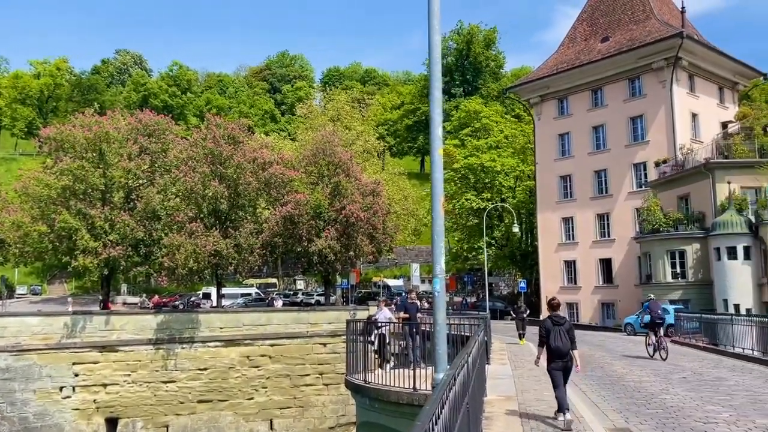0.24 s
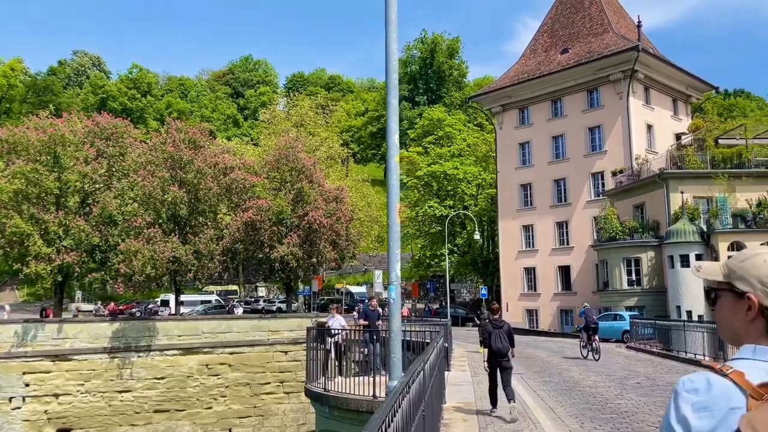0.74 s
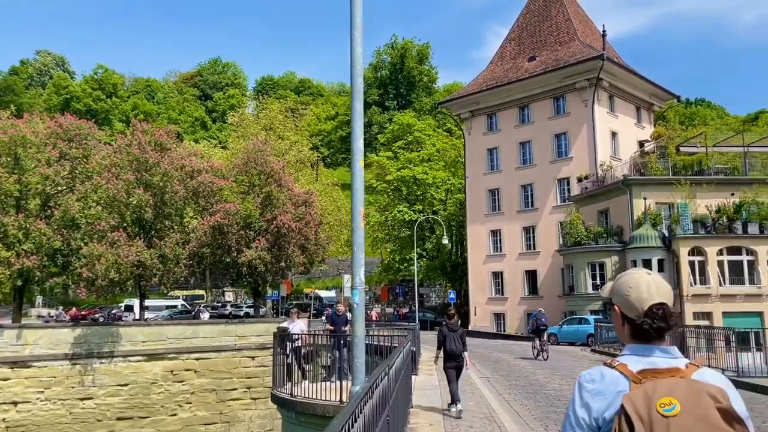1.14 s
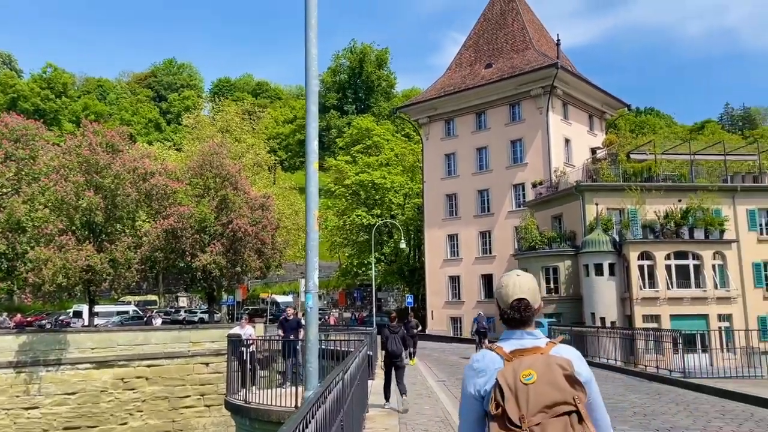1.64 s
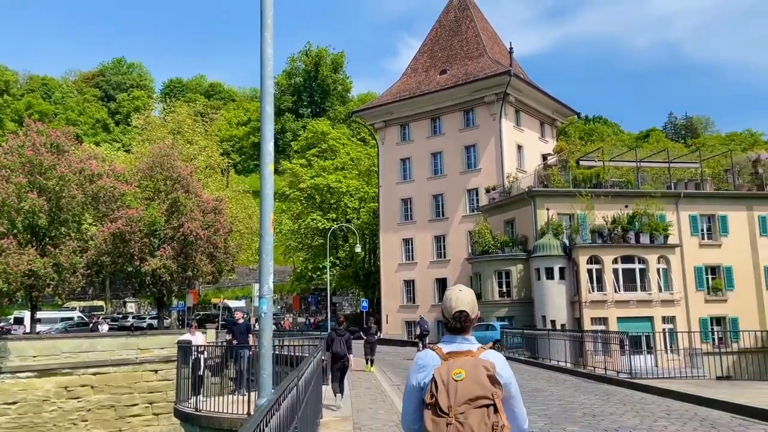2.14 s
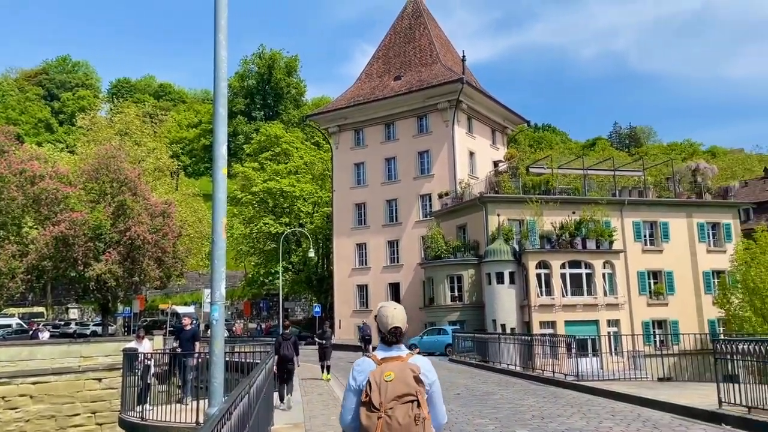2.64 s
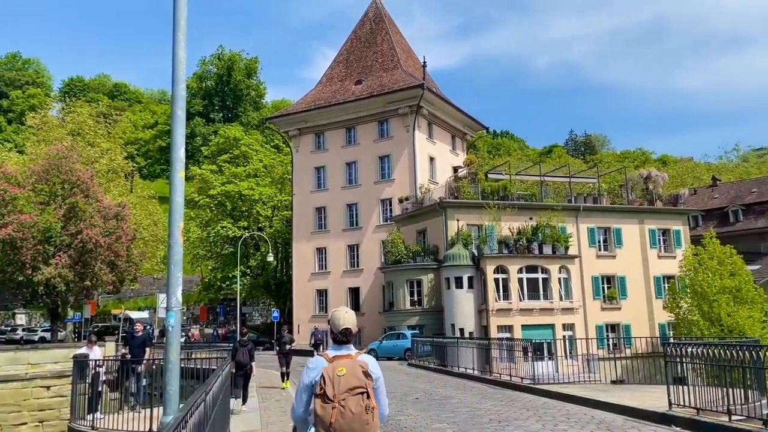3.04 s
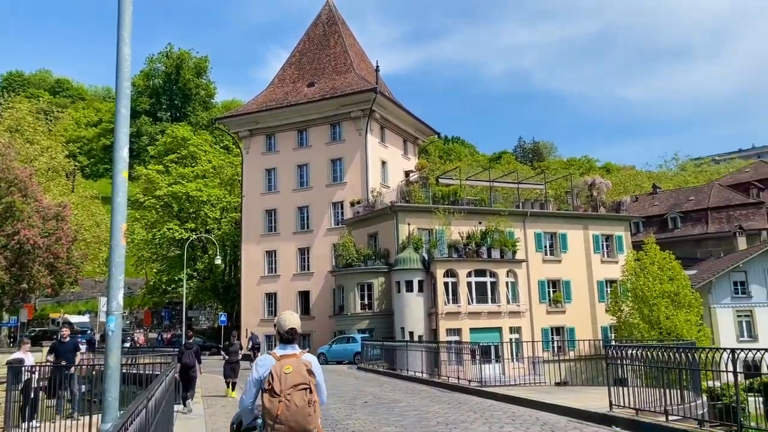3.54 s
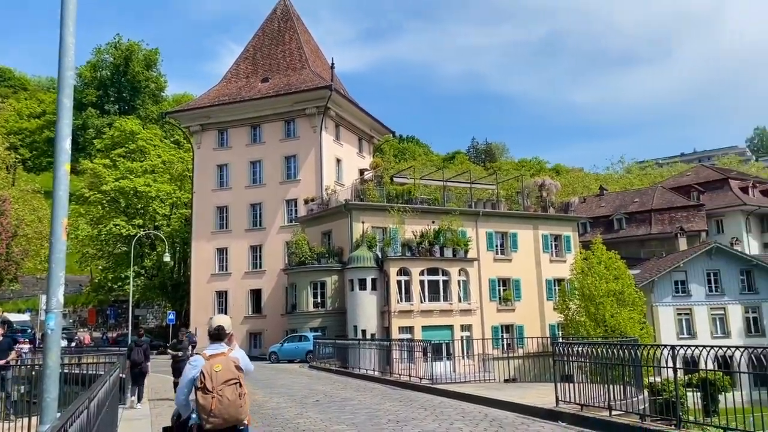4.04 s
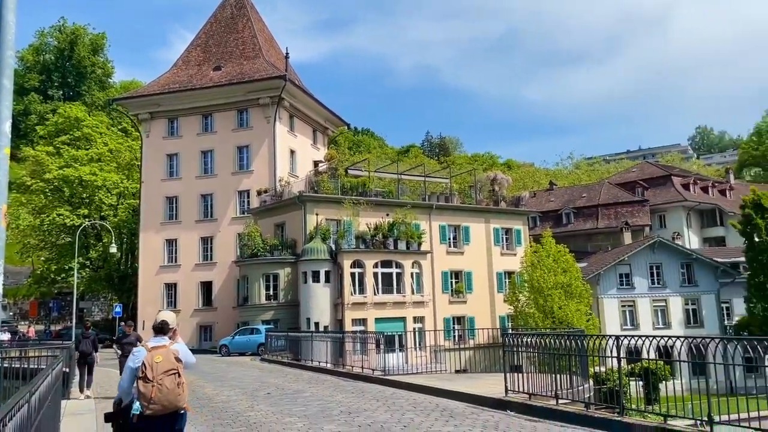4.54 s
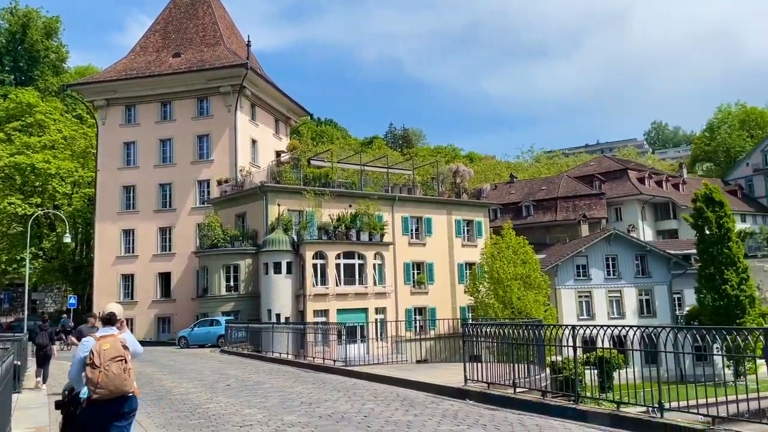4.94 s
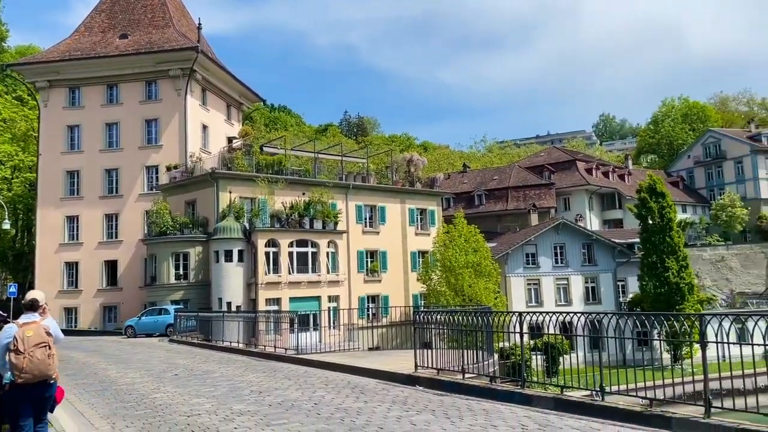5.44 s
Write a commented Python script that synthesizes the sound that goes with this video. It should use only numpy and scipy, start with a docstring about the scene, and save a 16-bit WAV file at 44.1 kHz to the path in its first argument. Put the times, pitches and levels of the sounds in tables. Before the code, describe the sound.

A stereo microphone on a town bridge pavement hears a river rushing below throughout, about 5.7 seconds. The water is a full, even roar leaning slightly left, with wide bubbly fizz and fine spray that gradually soften and dull. Beneath it lies deep traffic rumble and a low, unsteady engine drone that wavers in pitch and strength, sinking lower near the end. In the first half second come several dull low bumps, small splashes and a knock, with dry grit ticks scattered until about 0.9. A bright ringing click strikes at 1.3. Tiny pitched knocks appear near 1.1, 1.5, 2.7 and 2.9, with a clearer pair at 3.3 beside a little splash. A thin distant chirp sounds at 2.8, then rougher faint calls from 3.9 onward, lightly echoed. Tyres swell softly around 4.4; a small splash at 5.0 and another bump at 5.3 follow. Faint twitter hides in the fizz.

```python
"""River below a town bridge

Heard from the pavement, broken water roars and foam fizzes: shaped noise with many tiny bubble rings.
The fizz fades and dulls as the microphone moves on. Road traffic is low noise with one wavering engine
drone of a few sines and a few dull, short tone bumps. Small noise splashes, thin distant chirps, faint
gliding twitter, ticks of grit, one ringing click and small pitched knocks poke through the rush."""
import sys
import numpy as np
from scipy import signal
from scipy.fft import rfft, irfft, next_fast_len
from scipy.io import wavfile
from scipy.ndimage import uniform_filter1d, map_coordinates

SR = 44100
rng = np.random.default_rng(int(sys.argv[2]) if len(sys.argv) > 2 else 0)


def generate_wav(sig):
    """Save sig (samples, or channels by samples) to the path in sys.argv[1] as 16-bit PCM at SR."""
    pcm = np.round(np.clip(np.atleast_2d(sig).T, -1, 1) * 32767).astype(np.int16)
    wavfile.write(sys.argv[1], SR, pcm)


N = 250488

# Spectra below give relative density, since each layer is scaled to rms 1 before its level is set.
# Likeness is the left-right correlation: 1 the same on both sides, 0 unrelated, -1 opposed.

# Road rumble over time, before its gain: [t/s, level/dB]
ROAD_LEVEL = [(0.0, -51), (0.7, -53.5), (2.01, -55.5), (3.3, -54), (4.18, -53), (4.67, -49), (5.01, -53.5),
              (5.68, -54.5)]
# Spectrum of the road rumble: [f/Hz, density/dB]
RUMBLE_SPECTRUM = [(12, -70), (25, -39), (38, -16), (55, -4), (75, -3), (98, -3.5), (120, -0.5),
                   (150, -19.5), (260, -17), (600, -88)]
# One swell of rolling tyres
ROLL_START_S, ROLL_LENGTH_S, ROLL_DB, ROLL_HZ = 3.85, 1.1, -50, 220

# Engine firing rate over time: [t/s, f/Hz]
ENGINE_RATE = [(0.0, 80.2), (0.19, 72.2), (1.17, 76.4), (1.79, 84), (2.17, 82.53), (2.96, 73.06),
               (3.7, 84.3), (4.57, 80.26), (4.89, 75.6), (5.16, 66.44), (5.68, 64.6)]
# Engine drone over time, before its gain: [t/s, level/dB]
DRONE_LEVEL = [(0.0, -39), (0.15, -41), (0.22, -48), (0.33, -39), (0.48, -45), (0.85, -36.5), (0.95, -43),
               (1.1, -40), (1.32, -46), (1.44, -37), (2.03, -36), (2.17, -48), (2.33, -40), (2.43, -48),
               (2.8, -37.5), (2.97, -35.5), (3.3, -48), (3.35, -33), (3.54, -33.5), (3.58, -40), (3.8, -36),
               (4.45, -43), (4.55, -58), (4.79, -48), (4.83, -36), (4.95, -42), (5.12, -40), (5.22, -47),
               (5.5, -50), (5.68, -42)]
# Partials of the drone, before flutter: [multiple of the firing rate, relative level/dB]
DRONE_ORDERS = [(1, 0), (1.5, -18), (2, -23)]

# Dull bumps: [t/s, peak level/dB, f/Hz]
BUMPS = [(.006, -24, 86), (.148, -30, 75), (.25, -33, 110), (.39, -34, 100), (5.322, -27.5, 85)]
BUMP_CYCLES = 2.75  # length of each bump

# Distant calls, before waver and flutter: [t/s, length/s, f/Hz, rise over the call/Hz,
# arch in the middle/Hz, level/dB, swell over the call/dB, roughness 0-1]
CALLS = [(2.786, .034, 2600, -10, 0, -54, 0, .3), (2.788, .094, 2688, 18, 6, -42.8, 5, .12),
         (3.878, .022, 2240, 0, 0, -53, 0, .2), (3.88, .026, 2550, -40, 0, -52, 0, .5),
         (3.884, .138, 2660, -22, 0, -52.5, -1, .42), (4.012, .04, 2130, -30, 0, -56, -2, .6),
         (4.13, .032, 3460, 50, 0, -58, 4, .3), (4.553, .038, 2680, -90, 20, -52, 0, .4),
         (4.58, .17, 2175, 55, 60, -52.8, -3, .45), (4.87, .1, 2700, 80, 0, -61.5, 0, .6),
         (4.925, .085, 1905, 10, 25, -57.5, 0, .4), (5.15, .04, 2470, 60, 0, -57.5, 0, .5),
         (5.197, .115, 2940, 60, 25, -58.5, -4, .55), (5.56, .112, 2310, 40, 0, -53.5, 6, .25)]
CALL_ATTACK_S, CALL_RELEASE_S = 0.012, 0.011
# For roughness 1: scale of the random pitch and level tremble, and the pulse rate
CALL_WAVER_HZ, CALL_FLUTTER_DB, CALL_PULSE_HZ = 38, 3, 58

# Faint flecks: rate, range of starting pitch, mean length
TWITTER_PER_S, TWITTER_LOW_HZ, TWITTER_HIGH_HZ, TWITTER_MEAN_S = 26, 1700, 4200, .02
TWITTER_GLIDE = .06  # largest glide, as a share of the pitch
TWITTER_DB = -2.5  # relative to the fizz column of RIVER_LEVEL

# Ticks of grit: [t/s, level before the attack/dB, centre f/Hz]
GRIT_TICKS = [(.251, -45, 12100), (.276, -45, 3600), (.417, -52, 10600), (.455, -51, 10600),
              (.531, -52, 10200), (.544, -46, 9900), (.566, -52, 10000), (.636, -52, 11000),
              (.706, -50, 10200), (.789, -49, 10000), (.93, -45, 2800), (2.157, -46, 3400),
              (3.309, -47, 4950)]
TICK_T60_S, TICK_OCTAVES = .026, .13  # decay and band width

# One sharp click; the crack's level is relative to CLICK_DB
CLICK_S, CLICK_DB, CLICK_CRACK_DB = 1.3055, -36, 3
# Ringing modes of the struck object: [f/Hz, relative level/dB, t60/s]
RING_MODES = [(2300, -5, .02), (2950, -2, .018), (3350, -4, .018), (4080, -2.5, .022), (5180, -5, .014),
              (6400, -5, .012), (7000, -5, .012)]

# Small knocks: [t/s, peak level of the fundamental's envelope/dB, f/Hz, overtone strength 0-1]
KNOCKS = [(.174, -32.5, 720, .3), (1.1, -39, 2130, 0), (1.519, -36, 2400, 0), (2.661, -37, 1450, .1),
          (2.932, -40, 1800, .1), (3.2862, -29.7, 900, .5), (3.3095, -37.5, 830, .2)]
KNOCK_ATTACK_S, KNOCK_T60_S = .0022, .014
KNOCK_OVERTONE = 1.5  # multiple of the knock's pitch

# Breaking wavelets, before spatter: [t/s, length/s, level/dB, centre f/Hz]
WAVELETS = [(.075, .045, -51, 3600), (.095, .06, -46, 2200), (.125, .06, -54, 5000), (.163, .035, -39, 650),
            (.39, .09, -51.5, 3300), (3.29, .04, -46, 1300), (5.04, .05, -47, 1100)]

# River at the microphone, before gains: [t/s, fizz level/dB, finest-spray level/dB]
RIVER_LEVEL = [(0.0, -52.5, -61.5), (0.35, -53, -60), (1.01, -53.5, -63.5), (3.11, -54.5, -64),
               (3.86, -55.5, -66.5), (4.38, -56.5, -67), (5.03, -55.5, -65), (5.68, -56.5, -66)]
# Spectrum of the roar of broken water: [f/Hz, density/dB]
ROAR_SPECTRUM = [(60, -6), (150, 3.5), (250, 0.5), (400, -0.5), (800, -3.5), (1100, -6), (1600, -9),
                 (2300, -9.5), (2900, -18.5), (4500, -27), (9000, -69)]
# Left-right likeness of the roar: [f/Hz, likeness -1 to 1]
ROAR_ALIKE = [(120, 1), (350, 0.67), (1000, 0.59), (2200, 0.47), (4000, 0.11)]
# Stereo balance of the roar: [f/Hz, left minus right level/dB]
ROAR_SIDE = [(150, -0.5), (400, 2.5), (700, 3), (1300, 1), (1800, -3.5), (2500, -1.5), (4000, 5)]
# Spectrum of the bursting foam: [f/Hz, density/dB]
FIZZ_SPECTRUM = [(700, -52), (1800, -9), (3000, 0), (4200, -3.5), (5800, -6.5), (7200, -6.5), (10000, -101),
                 (15000, -55)]
# Left-right likeness of the foam: [f/Hz, likeness -1 to 1]
FOAM_ALIKE = [(2500, -.15), (4000, .35), (6500, .1), (8200, -.3)]
# Spectrum of the finest spray: [f/Hz, density/dB]
SPRAY_SPECTRUM = [(4000, -25), (6800, -7), (7900, 1.5), (9700, 2.5), (10800, 0), (12500, -3), (14000, -5),
                  (15500, -4.5)]
# Left-right likeness of the spray: [f/Hz, likeness -1 to 1]
SPRAY_LIKENESS = [(8400, -.8), (9600, 0), (10800, .92), (12400, .92), (13400, 0), (14200, -.97)]
ROAR_DB, FIZZ_GAIN_DB, SPRAY_GAIN_DB = -38, 3.5, 4.5  # mean roar level; gains on RIVER_LEVEL
ROAR_FOLLOWS = 0.87  # the roar fades less than the fizz (dB per dB)

BAND_LIMIT_HZ = 15750


def amp(db):
    """Decibels to gain."""
    return 10 ** (np.asarray(db) / 20)


def unit(x):
    """Scale to rms 1."""
    return x / np.sqrt(np.mean(x ** 2) + 1e-20)


def along(points, hz):
    """Read (Hz, value) points on a log frequency axis."""
    f, v = np.transpose(points)
    return np.interp(np.log(hz + 1), np.log(f + 1), v)


def curves(rows):
    """One value per sample for each column after the time."""
    s, *cols = np.transpose(rows)
    t = np.arange(N) / SR
    return [np.interp(t, s, c) for c in cols]


def wobble(rate):
    """A smooth random curve with rate knots a second."""
    knots = rng.standard_normal(int(N * rate / SR) + 4)
    return map_coordinates(knots, [np.arange(N) * rate / SR])


def filtered(x, response):
    """Multiply the spectrum of x by a complex response of frequency."""
    m = next_fast_len(N + SR // 2)
    hz = np.fft.rfftfreq(m, 1 / SR)
    return irfft(rfft(x, m) * response(hz), m)[..., :N]


def churn(patchy_db):
    """Two white noises whose strength drifts together in patches of time and pitch."""
    z = signal.stft(rng.standard_normal((2, N)), nperseg=512)[2]
    field = rng.standard_normal(z.shape[1:])
    field = uniform_filter1d(field, size=7, axis=0)
    field = uniform_filter1d(field, size=16, axis=1)
    patchy = z * amp(patchy_db * unit(field))
    return unit(signal.istft(patchy, nperseg=512)[1][:, :N])


def spread(pair, spectrum, alike):
    """Colour two signals and blend them into left and right of a set likeness, rms 1."""
    def mid_side(hz):
        turn = np.arccos(np.clip(along(alike, hz), -1, 1)) / 2
        return amp(along(spectrum, hz)) * [np.cos(turn), np.sin(turn)]

    mid, side = filtered(pair, mid_side)
    return unit(np.array([mid + side, mid - side]))


def burst(centre_hz, octaves):
    """Steady stereo noise of rms 1 around one pitch, mostly alike on both sides."""
    def band(hz):
        return np.exp(-.5 * (np.log2((hz + 1) / centre_hz) / octaves) ** 2)

    noise = rng.standard_normal(N) + .5 * rng.standard_normal((2, N))
    return unit(filtered(noise, band))


def arch(s, length):
    """A smooth rise and fall that starts at s."""
    return np.sin(np.pi * np.clip((np.arange(N) / SR - s) / length, 0, 1))


def from_right(x, lag_s):
    """A sound from the right reaches the left microphone late."""
    ears = np.array([[-.5], [.5]])
    return filtered(x, lambda hz: np.exp(2j * np.pi * hz * lag_s * ears))


def traffic(rumble_db=8):
    """Tyres on paving stones: a deep noise rumble, much alike on both sides, and one soft swell."""
    road_db, = curves(ROAD_LEVEL)
    rumble = spread(churn(patchy_db=0.8), RUMBLE_SPECTRUM, [(60, 0.79), (200, 0.99)])
    roll = amp(ROLL_DB) * arch(ROLL_START_S, ROLL_LENGTH_S) * burst(ROLL_HZ, octaves=0.43)
    return amp(road_db + rumble_db) * rumble + roll


def engine(drone_db=0.2, flutter_db=1.0, drift_rad=0.56):
    """Only the lowest orders of an engine carry this far; each flutters on its own."""
    hz, = curves(ENGINE_RATE)
    level, = curves(DRONE_LEVEL)
    phase = 2 * np.pi * np.cumsum(hz) / SR
    drone = np.zeros(N)
    for order, db in DRONE_ORDERS:
        strength = amp(db + flutter_db * wobble(16))
        drone += strength * np.sin(order * phase + drift_rad * wobble(17))
    return amp(level + drone_db) * unit(drone)


def thumps():
    """Dull bumps: low tones a few cycles long, perhaps wheels on the paving."""
    out, t = np.zeros(N), np.arange(N) / SR
    for s, db, hz in BUMPS:
        out += amp(db) * arch(s, BUMP_CYCLES / hz) * np.sin(2 * np.pi * hz * (t - s))
    return out


def chirps(echo_db=-16, echo_t60_s=0.44):
    """Thin whistles, clean or pulsing, perhaps a bird over the water; house fronts answer."""
    out, t = np.zeros(N), np.arange(N) / SR
    waver, flutter = wobble(130), wobble(150)
    pulse = np.sin(2 * np.pi * CALL_PULSE_HZ * t + wobble(40))
    for s, length, hz, rise_hz, arch_hz, db, swell_db, rough in CALLS:
        on = slice(int(s * SR), min(int((s + length) * SR), N))
        age = t[on] - s
        pitch = hz + rise_hz * age / length + arch_hz * np.sin(np.pi * age / length)
        pitch += rough * CALL_WAVER_HZ * waver[on]
        gate = np.minimum(age / CALL_ATTACK_S, (length - age) / CALL_RELEASE_S).clip(0, 1)
        level = db + swell_db * (age / length - .5) + rough * CALL_FLUTTER_DB * flutter[on]
        whistle = np.sqrt(2) * np.sin(2 * np.pi * np.cumsum(pitch) / SR)
        out[on] += amp(level) * gate * (1 + rough * pulse[on]) * whistle
    # the echo is a decaying noise tail, different on each side
    tail = rng.standard_normal((2, SR // 2)) * amp(-60 * t[:SR // 2] / echo_t60_s)
    echo = signal.fftconvolve(out[None], tail / np.linalg.norm(tail[0]), axes=1)[:, :N]
    return from_right(out, lag_s=.00005) + amp(echo_db) * echo


def twitter():
    """Faint gliding tones from left to right, half buried in the fizz, perhaps gurgles or far birds."""
    out = np.zeros((2, N + SR))
    fizz_level, _ = curves(RIVER_LEVEL)
    for when, pitch, glide, life, size, side in rng.random((int(TWITTER_PER_S * N / SR), 6)):
        u = np.linspace(0, 1, int(TWITTER_MEAN_S * (.5 + life) * SR))
        start_hz = np.interp(pitch, [0, 1], [TWITTER_LOW_HZ, TWITTER_HIGH_HZ])
        hz = start_hz * (1 + TWITTER_GLIDE * (2 * glide - 1) * u)
        strength = (.5 + size) * TWITTER_LOW_HZ / hz  # higher flecks are weaker
        note = strength * np.sin(np.pi * u) * np.sin(2 * np.pi * np.cumsum(hz) / SR)
        first = int(when * N)
        out[:, first:first + len(u)] += np.sqrt([[side], [1 - side]]) * note
    return amp(fizz_level + TWITTER_DB) * out[:, :N]


def ticks(attack_s=0.00024):
    """Grit on the pavement: brief dry noise bursts, each around its own pitch."""
    out, t = np.zeros((2, N)), np.arange(N) / SR
    for s, db, centre_hz in GRIT_TICKS:
        age = np.maximum(t - s, 0)
        envelope = amp(db - 60 * age / TICK_T60_S) * (1 - np.exp(-age / attack_s))
        out += envelope * burst(centre_hz, TICK_OCTAVES)
    return out


def click(attack_s=0.00046):
    """One small hard object is struck: a bright noise crack and a short ring of damped modes."""
    age = np.maximum(np.arange(N) / SR - CLICK_S, 0)
    ring = sum(amp(db - 60 * age / t60) * np.sin(2 * np.pi * hz * age) for hz, db, t60 in RING_MODES)
    crack = amp(CLICK_CRACK_DB - 60 * age / .01) * burst(4600, octaves=.6)  # t60 of 10 ms
    return amp(CLICK_DB) * (1 - np.exp(-age / attack_s)) * (ring + crack)


def plops():
    """Small pitched knocks: each rings briefly, with or without an overtone, and is gone."""
    out, t = np.zeros(N), np.arange(N) / SR
    for s, db, hz, overtone in KNOCKS:
        age = np.maximum(t - s, 0)
        swell = amp(-60 * age / KNOCK_T60_S) * (1 - np.exp(-age / KNOCK_ATTACK_S)) ** 2
        phase = 2 * np.pi * hz * age
        tone = np.sin(phase) + overtone * np.sin(KNOCK_OVERTONE * phase)
        out += amp(db) * swell / swell.max() * tone
    return out


def splashes(octaves=0.48, spatter_db=2):
    """Wavelets break: short, spattering noise swells above the rush."""
    out = np.zeros((2, N))
    for s, length, db, hz in WAVELETS:
        out += amp(db + spatter_db * wobble(200)) * arch(s, length) * burst(hz, octaves)
    return out


def bubbles(low_hz, high_hz, cycles, scatter_db, count):
    """Tiny damped rings at random moments; scatter makes many weak and a few strong."""
    when, pitch, size = rng.random((count, 3)).T[:, :, None]
    k = np.arange(384)  # samples in each ring
    hz = low_hz * (min(high_hz, SR / 2) / low_hz) ** pitch
    age = hz * k / SR  # in cycles
    strength = amp(-scatter_db * np.log(np.maximum(size, .01))) * np.sqrt(hz)
    rings = strength * np.sin(2 * np.pi * age) * np.exp(-age / cycles)
    place = (when * N).astype(int) + k
    return unit(np.bincount(place.ravel(), rings.ravel(), N)[:N])


def river(lead_s=0.00014, burble_db=-13, bubble_db=-7, splash_db=.5):
    """Broken water roars from the left; foam and spray fizz widely and fade more than the roar."""
    fizz_level, spray_level = curves(RIVER_LEVEL)
    roar_level = ROAR_DB + ROAR_FOLLOWS * (fizz_level - fizz_level.mean())
    ears = np.array([[.5], [-.5]])

    def bearing(hz):
        # the roar reaches the left microphone first
        return amp(ears * along(ROAR_SIDE, hz)) * np.exp(2j * np.pi * hz * ears * lead_s)

    burble = np.array([bubbles(low_hz=597, high_hz=2660, cycles=4.5, scatter_db=1.8, count=2500)
                       for _ in range(2)])
    water = churn(patchy_db=.8) + amp(burble_db) * burble
    roar = unit(filtered(spread(water, ROAR_SPECTRUM, ROAR_ALIKE), bearing))
    # smaller bubbles burst in the foam
    pops = np.array([bubbles(low_hz=1998, high_hz=14140, cycles=4.0, scatter_db=0.0, count=6000)
                     for _ in range(2)])
    fizz = spread(churn(patchy_db=1.0) + amp(bubble_db) * pops, FIZZ_SPECTRUM, FOAM_ALIKE)
    spray = spread(churn(patchy_db=2.5) + amp(bubble_db) * pops, SPRAY_SPECTRUM, SPRAY_LIKENESS)
    foam = amp(FIZZ_GAIN_DB + fizz_level) * fizz + amp(SPRAY_GAIN_DB + spray_level) * spray
    return amp(roar_level) * roar + amp(splash_db * wobble(20.95)) * foam


def scene():
    """Traffic beneath, small sounds between, water in front."""
    street = traffic() + engine() + thumps()
    small_sounds = chirps() + twitter() + ticks() + click() + plops()
    return street + small_sounds + splashes() + river()


def record(dry):
    """The recorder keeps nothing above its band limit."""
    return filtered(dry, lambda hz: hz < BAND_LIMIT_HZ)


dry = scene()
out = record(dry)
generate_wav(out)
```